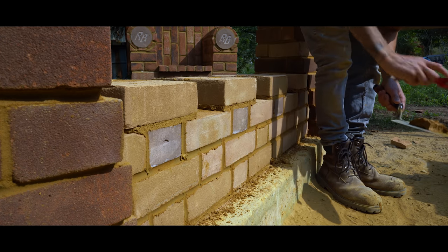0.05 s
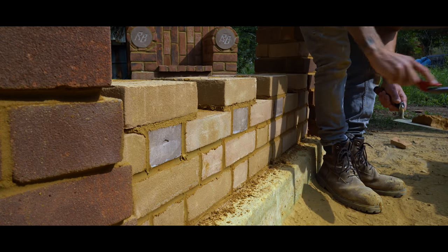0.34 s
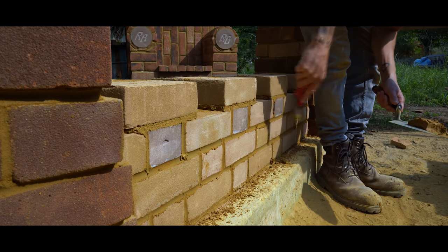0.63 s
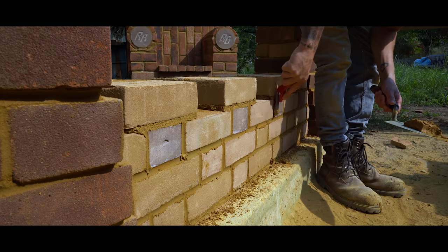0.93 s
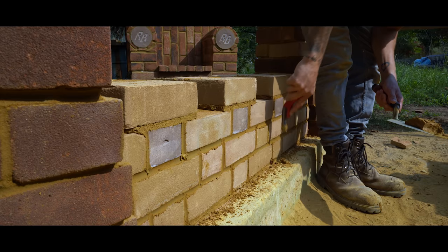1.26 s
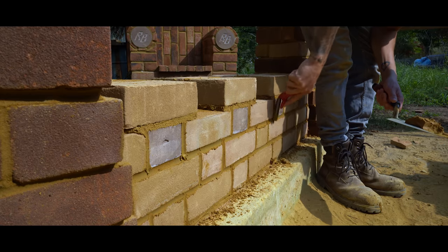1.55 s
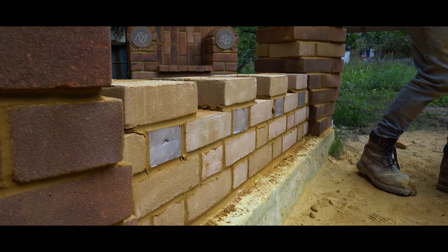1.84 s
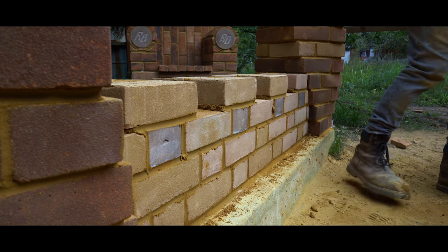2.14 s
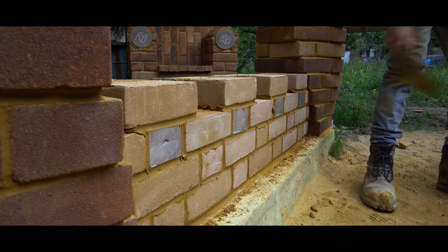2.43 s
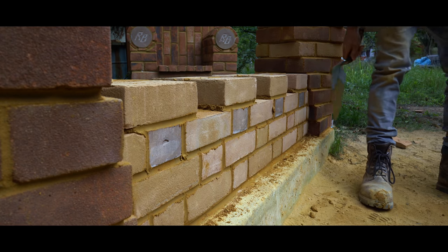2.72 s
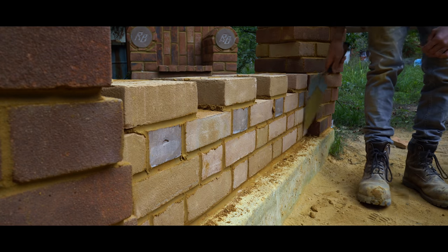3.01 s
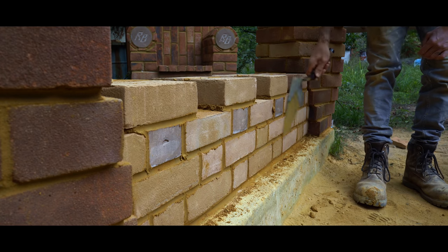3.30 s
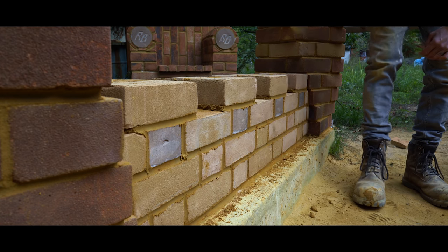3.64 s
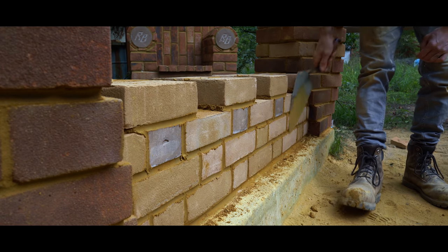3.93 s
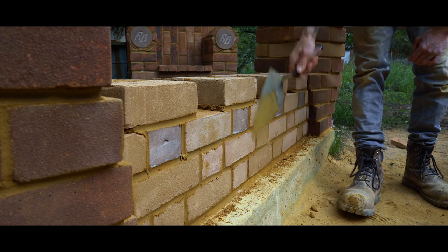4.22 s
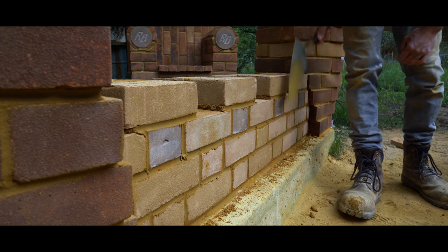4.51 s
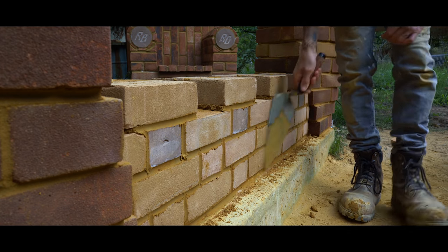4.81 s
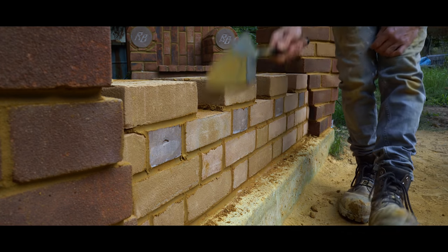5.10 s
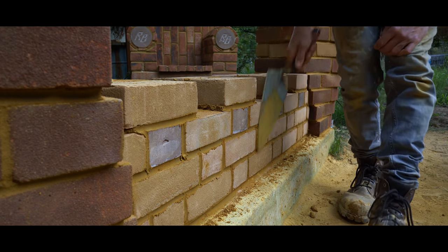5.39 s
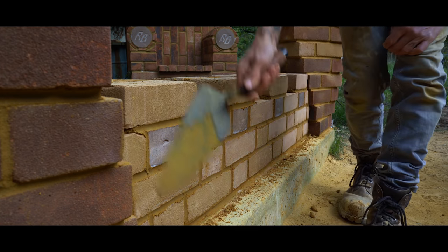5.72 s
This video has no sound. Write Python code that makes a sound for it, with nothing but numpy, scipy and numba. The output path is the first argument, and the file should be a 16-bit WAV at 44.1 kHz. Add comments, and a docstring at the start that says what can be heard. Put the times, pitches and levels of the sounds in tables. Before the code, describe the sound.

The scene is outdoors at a brick wall, with a faint wash of leaves and distant traffic. At about 0.2 seconds a tool raps a brick once, sharp and dry. Faint, short scratches in mortar follow at 1.1 and 1.7 seconds, with a small click at 1.6, while a far engine hums. At 1.8 seconds the background drops abruptly, and tool and brick clatter lightly with a thin steel ring. Boots tread softly on sand at about 2.5 and 3 seconds. Then a steel trowel scrapes along the brick face four times, close and loud, starting at about 3.1, 4.0, 4.7 and 5.4 seconds. Each stroke lasts nearly half a second and swells into a harsh rasp of rattling, hissing grit with tiny squeaks. The blade rings lightly each time it lifts, the last time at 5.9 seconds.

```python
"""At a garden wall outdoors, a bricklayer raps a brick and scratches mortar from a joint.
Tool and brick clatter, and boots tread on sand. Then a steel trowel is drawn four times along the
brick face: grit rattles and hisses under the pressed blade, which squeaks and rings on when it lifts.
Behind it all are leaves, far traffic and an engine; this background drops abruptly before the strokes."""
import sys
import numpy as np
from scipy import signal
from scipy.fft import rfft, irfft
from scipy.io import wavfile
from scipy.ndimage import uniform_filter1d
from numba import njit

SR = 44100
rng = np.random.default_rng(int(sys.argv[2]) if len(sys.argv) > 2 else 0)


def wav_out(sig):
    """Save sig, one row per channel (or a flat mono array), as 16-bit PCM at SR to the path in sys.argv[1]."""
    wavfile.write(sys.argv[1], SR, np.round(np.clip(np.atleast_2d(sig).T, -1, 1) * 32767).astype(np.int16))


N = 262395
TIME = np.arange(N) / SR
QUIETER_S = 1.789  # when the background drops

# Trowel strokes: the blade lands, hops, bites, is pushed along and springs off. Columns:
# lands_s, bites_s, leaves_s, landing_db, hardest_push_s, push_db, swell_db, sag_db,
# fine_grit_db, brick_body_db, free_ring_db, bend_hz, bend_boost_db
STROKES = [(3.123, 3.158, 3.558, -27.5, 3.38, -24.5, 6.5, 5, -5.5, -20, -42.5, 1680, 8),
           (3.963, 4.014, 4.366, -26, 4.27, -21, 7, 6, -5.5, -20, -39.5, 1056, 27),
           (4.709, 4.737, 5.156, -31, 5.09, -19.5, 9, 2, -5, -18, -38.5, 1171, 29),
           (5.442, 5.490, 5.906, -25, 5.70, -19.3, 6, 2.5, -4, -16, -37, 1680, 10)]


def undb(db):
    """Turn decibels into a factor to multiply by."""
    return 10 ** (np.asarray(db) / 20)


def unit(x):
    """Scale to an average strength (rms) of 1."""
    return x / np.sqrt(np.mean(x ** 2) + 1e-20)


def add(out, start_s, x):
    """Mix x into out from start_s on."""
    i = int(start_s * SR)
    out[i:i + len(x)] += x[:N - i]


def progress(start_s, end_s):
    """Share of the way from one moment to another, 0 to 1."""
    return np.clip((TIME - start_s) / (end_s - start_s), 0, 1)


def fade(fade_s):
    """Half a second of dying away. Here and below, fade_s is the time taken to fall by 60 dB."""
    return np.exp(-np.log(1000) * TIME[:SR // 2] / fade_s)


def walk(per_s):
    """Smooth random wandering, about 1 in size."""
    hold = max(int(SR / per_s), 1)
    jumps = np.repeat(rng.standard_normal(N // hold + 1), hold)
    return unit(uniform_filter1d(uniform_filter1d(jumps, hold), hold)[:N])


def colour(x, points):
    """Shape the tone along (pitch_hz, level_db) points; white noise keeps its overall strength."""
    size = 4096
    hz, db = np.transpose(points)
    grid_hz = np.maximum(np.fft.rfftfreq(size, 1 / SR), 1)
    gains = undb(np.interp(np.log(grid_hz), np.log(hz), db))
    cepstrum = irfft(np.log(gains))
    cepstrum[1:size // 2] *= 2  # folded forward, so the filter never sounds before its input
    cepstrum[size // 2 + 1:] = 0
    response = irfft(np.exp(rfft(cepstrum)))
    return signal.fftconvolve(x, response / np.linalg.norm(response))[:len(x)]


def low_cut(x, hz):
    """Turn down the bass below hz."""
    return signal.sosfilt(signal.butter(3, hz, "high", fs=SR, output="sos"), x)


@njit
def band_pass(x, hz, width_hz):
    """Let through a band around a pitch that may move."""
    out, band, low = np.empty(len(x)), 0., 0.
    for i in range(len(x)):
        tuning = np.tan(np.pi * min(hz[i], .45 * SR) / SR)
        damping = np.pi * width_hz / SR * (1 + tuning * tuning) / tuning
        swing = (band + tuning * (x[i] - low)) / (1 + tuning * (tuning + damping))
        band = 2 * swing - band
        low += 2 * tuning * swing
        out[i] = damping * swing
    return out


def resonate(x, tones, drift, swell_db):
    """Shake an object's own tones with x; the moving contact shifts each and feeds it more or less."""
    out = 0
    for k, (hz, width_hz, db) in enumerate(tones):
        feed = unit(undb(swell_db * np.tanh(walk(28))))
        pitch_hz = hz * (1 + drift * walk(12))
        out = out + (-1) ** k * undb(db) * band_pass(x * feed, pitch_hz, float(width_hz))
    power = sum(undb(db) ** 2 * np.pi * width_hz / SR for _, width_hz, db in tones)
    return out / np.sqrt(power)


def ring(tones, rise_s):
    """A struck object's tones die away freely; neighbours swing opposite ways."""
    t = TIME[:SR]
    out = sum((-1) ** k * undb(db - 60 * t / fade_s) * np.sin(2 * np.pi * hz * t)
              for k, (hz, db, fade_s) in enumerate(tones))
    return out * (1 - np.exp(-t / rise_s))


def grit(per_s, spread_db):
    """Sand grains break at random; a wider spread makes a few much louder than the rest."""
    size = undb(spread_db * np.clip(rng.standard_normal(N), -2, 2))
    breaks = rng.random(N) < per_s / SR
    return unit(breaks * size * rng.choice([-1, 1], N))


def slips(per_s, spread_db, length_s, top_hz):
    """Brief runs of sticking and slipping, each at its own pitch and strength."""
    out = np.zeros(N)
    for when, pitch, span, size, phase in rng.random((int(per_s * N / SR), 5)):
        t = TIME[:int(length_s * (.5 + span) * SR)]
        tone = np.sin(2 * np.pi * (top_hz * pitch * t + phase))
        add(out, when * N / SR, undb(spread_db * size ** 3) * np.hanning(len(t)) * tone)
    return unit(out)


def contact(start_s, end_s, db, release_s):
    """Loudness of one scrape: it bites quickly, follows db, then lets go."""
    bite = np.clip((TIME - start_s) / 0.00056, 0, 1)
    release = np.exp(-np.maximum(TIME - end_s, 0) / release_s)
    return undb(db) * bite * release


def yard(x, near_db=-15, near_fade_s=0.11, far_db=-26, far_fade_s=0.34):
    """Add quick echoes from wall and ground, then a faint tail from the buildings around."""
    out = x
    for db, fade_s, delay_s in ((near_db, near_fade_s, .002), (far_db, far_fade_s, .012)):
        scatter = colour(rng.standard_normal(SR // 2), [(200, -8.5), (4000, 5), (15000, -4.5)])
        echo = scatter * fade(fade_s) * (TIME[:SR // 2] > delay_s)
        out = out + undb(db) * signal.fftconvolve(x, echo / np.linalg.norm(echo))[:N]
    return out


def open_air():
    """Leaves and far traffic waver gently; at first they are louder and a far engine drones."""
    # Tone of the air before and after it drops: pitch_hz, level_db
    early_tone = [(25, -25), (60, -5), (230, -2.5), (500, -9), (1050, -6), (2600, -19.5), (3800, -15),
                  (5500, -27), (15500, -47.5)]
    late_tone = [(25, -26.5), (60, -12), (130, -3), (400, -6.5), (850, -8.5), (1400, -14), (2600, -18.5),
                 (3900, -17.5), (5700, -30), (15500, -46.5)]
    # The engine swelling and sinking: time_s, level_db
    engine_levels = [(0, -80.5), (.85, -69), (1.15, -58.5), (1.5, -57), (1.79, -67)]
    early = undb(-50.5 + 0.13 * walk(1.4)) * colour(rng.standard_normal(N), early_tone)
    late = undb(-63 + .5 * walk(2.9)) * colour(rng.standard_normal(N), late_tone)
    engine_db = np.interp(TIME, *np.transpose(engine_levels)) + 2 * walk(12)
    engine_hz = 60 * (1 + 0.035 * walk(9.8))
    engine = undb(engine_db) * np.sin(2 * np.pi * np.cumsum(engine_hz) / SR)
    return np.where(TIME < QUIETER_S, early + engine, late)


def boots():
    """The sole gives one soft push, then the sand crunches under it."""
    # Footfalls: time_s, thud_db, thud_hz, crunch_db, crunch_fade_s
    steps = [(2.4505, -23, 291.9, -44, 0.097), (2.482, -38, 241, -62, .05), (2.998, -39.5, 302, -47, 0.17),
             (3.024, -39.5, 293, -48, 0.076), (3.06, -46.5, 260, -70, .04)]
    # Tone of trodden sand: pitch_hz, level_db
    sand_tone = [(80, -22.5), (170, 1), (400, 9.5), (900, 4), (1400, 2), (2000, 0.5), (4000, -5.5),
                 (8000, -30), (15000, -37)]
    out = np.zeros(N)
    t = TIME[:SR // 2] - .01  # starts early to hold both halves of the thud
    for time_s, thud_db, thud_hz, crunch_db, fade_s in steps:
        thud = -np.sin(2 * np.pi * thud_hz * t) * np.exp(-(t * thud_hz / 0.63) ** 2)
        crunch = fade(fade_s) * grit(per_s=2700, spread_db=0)[:len(t)]
        add(out, time_s + t[0], undb(thud_db) * thud)
        add(out, time_s + .002, undb(crunch_db) * colour(crunch, sand_tone))
    return out


def mortar_scratches():
    """A small tool presses ever harder into soft mortar until it slips out; sand ticks off."""
    # Scratches: start_s, length_s, final_db, final_sand_db, rasp_hz (the tool's tone, set by the grip)
    scratches = [(1.019, .01, -49.5, -56, 1991), (1.057, .162, -55.5, -53.5, 1400),
                 (1.099, 0.0715, -40, -64, 2260), (1.677, 0.1, -41, -49, 3640)]
    # Tone of rubbed mortar: pitch_hz, level_db
    mortar_tone = [(200, -8.5), (1000, -2), (1650, -10), (2050, -4), (3200, -3.5), (4000, -1.5),
                   (5200, -22), (9000, -38)]
    sand_tone = [(4000, -3), (6800, -2), (11000, -7), (15500, 4.5)]
    out = np.zeros(N)
    for start_s, length_s, db, sand_db, rasp_hz in scratches:
        end_s = start_s + length_s
        swell_db = -15.5 * progress(end_s, start_s) ** 2
        press = contact(start_s, end_s, swell_db, release_s=.003)
        catch = unit(undb(3.5 * np.tanh(walk(300))))
        rub, sand = grit(per_s=5000, spread_db=3), grit(per_s=1000, spread_db=4.5)
        rasp = unit(band_pass(rub, np.full(N, float(rasp_hz)), width_hz=530.))
        out += undb(db) * press * catch * unit(colour(rub, mortar_tone) + undb(-3) * rasp)
        out += undb(sand_db) * colour(press * catch * sand, sand_tone)
    return out * (TIME < QUIETER_S)


def knocks():
    """Tool and brick clatter: a gritty click, the brick's dull clack and a thin ring of steel."""
    # Light knocks: start_s, clack_db, click_db, click_hz, click_width_hz, click_fade_s, steel_db
    hits = [(1.612, -43, -31, 4337, 5600, 0.028, -70), (1.839, -37.5, -36.5, 2540, 1470, 0.05505, -43.5),
            (1.855, -34.5, -53, 2500, 1200, .04, -59), (1.879, -38.5, -42, 2580, 995, 0.05, -62),
            (1.937, -28.5, -42.5, 2800, 3184, 0.062, -54), (1.967, -42, -56, 3000, 2000, 0.0422, -50),
            (1.99, -55.5, -52, 3443, 3000, 0.02584, -48), (2.89, -56, -47, 1283, 600, 0.02028, -82)]
    # Tone of a knocked brick: pitch_hz, level_db
    clack_tone = [(90, -19), (180, 4), (400, -10), (650, -5.5), (900, 7), (1300, -1.5), (2000, -23),
                  (6000, -55)]
    # Tones of struck steel: pitch_hz, level_db, fade_s
    steel_tones = [(3940, 1.5, 0.11), (4060, -2, 0.034), (5680, -14, 0.1192), (5950, -30.5, .1),
                   (8700, -36, 0.092)]
    out = np.zeros(N)
    for start_s, clack_db, click_db, click_hz, width_hz, fade_s, steel_db in hits:
        click_noise, clack_noise = rng.standard_normal((2, SR // 2))
        centre_hz = np.full(SR // 2, float(click_hz))
        click = band_pass(click_noise, centre_hz, 0.91 * width_hz)
        click = band_pass(click, centre_hz, 0.54 * width_hz)  # a second pass narrows it further
        add(out, start_s, undb(click_db) * unit(click) * fade(fade_s))
        add(out, start_s, undb(clack_db) * colour(clack_noise * fade(0.061), clack_tone))
        add(out, start_s, undb(steel_db) * ring(steel_tones, rise_s=0.00055))
    return out


def brick_rap(start_s=0.241, crush_s=0.0065):
    """A hard blow crushes the brick's skin for an instant; tool and brick ring briefly."""
    # Tone of the crack: pitch_hz, level_db
    crack_tone = [(120, -41), (330, -3), (800, -3.5), (1700, -2.5), (3000, -6), (5500, -9.5), (12000, -11),
                  (15500, -17.5)]
    # Tones that ring after the blow: pitch_hz, level_db, fade_s
    rap_tones = [(305.5, 0, 0.14), (816, 6.5, 0.0461), (1255, -2.5, 0.0633), (1660, 9.5, 0.029),
                 (1893, -0.5, .05), (2200, 5, 0.032), (2795.6, -11, .08), (3320, -15, 0.0849)]
    out, t = np.zeros(N), TIME[:SR // 2]
    crush = undb(-14) * np.exp(-(t / crush_s) ** 2)
    tail = undb(-28) * fade(0.083)
    crack = (crush + tail) * np.minimum(t / 0.0004, 1) * rng.standard_normal(len(t))
    add(out, start_s, colour(crack, crack_tone))
    add(out, start_s, undb(-20) * ring(rap_tones, rise_s=0.002))
    return low_cut(out, hz=200)  # small things give off no deep bass


def blade_squeaks():
    """Now and then the slipping edge locks roughly onto one tone of the blade."""
    # Squeaks: middle_s, pitch_hz, level_db, core_s (the whole squeak is 3.4 times as long)
    squeaks = [(3.131, 2416, -27, 0.004783), (3.297, 1990, -23.5, 0.004), (3.36, 3811, -28, .016),
               (3.374, 3273, -26, .014), (3.993, 3700, -30.5, 0.019), (4.147, 3294, -26.5, 0.011),
               (4.174, 1353, -29, 0.018), (4.255, 3703, -28, .014), (4.914, 3102, -21, 0.011),
               (5.056, 3700, -20.5, .015), (5.876, 3280, -21, 0.017)]
    out = np.zeros(N)
    for middle_s, hz, db, core_s in squeaks:
        t = TIME[:int(3.4 * core_s * SR)]
        roughness = np.cumsum(.045 * rng.standard_normal(len(t)))
        tone = np.sqrt(2) * np.sin(2 * np.pi * hz * t + roughness)
        add(out, middle_s - t[-1] / 2, undb(db) * np.hanning(len(t)) * tone)
    return out


def blade_ring(hop_db=-16):
    """The free blade rings lightly as it hops, and again on lifting; the bend brings out a low tone."""
    # Tones of the free blade: pitch_hz, level_db, fade_s
    free_tones = [(725, 1.5, 0.21), (1106, -11.5, 0.41), (1255.5, 3, 0.46), (1671, -6.5, 0.38),
                  (2180, 3, 0.13), (2690, 3.5, 0.21), (3130, 2.5, 0.33), (3430, -2, 0.29),
                  (3300, 13.5, 0.16), (3840, -8.5, 0.57), (4230, -1.5, 0.18), (4940, -7, .18),
                  (5529, -23, .13)]
    out = np.zeros(N)
    hz, db, fade_s = np.transpose(free_tones)
    for lands_s, _, leaves_s, landing_db, *_, ring_db, bend_hz, boost_db in STROKES:
        apart = ((hz - bend_hz) / 95) ** 2
        bend_db = boost_db * (1 - apart) * np.exp(-apart / 2)  # tones near bend_hz gain, the next lose
        add(out, lands_s, undb(landing_db + hop_db) * ring(free_tones, rise_s=.004))
        add(out, leaves_s, undb(ring_db) * ring(zip(hz, db + bend_db, fade_s), rise_s=0.0017))
    return out


def blade_shimmer(x, share_db=-4, fade_s=0.091):
    """Add the blade's many small tones; each stroke holds it at a new angle and finds another set."""
    out = x.copy()
    for lands_s, _, leaves_s, *_ in STROKES:
        during = (TIME > lands_s - .1) & (TIME < leaves_s + .1)
        tones = rng.standard_normal(SR // 2) * fade(fade_s)
        out += undb(share_db) * signal.oaconvolve(x * during, tones / np.linalg.norm(tones))[:N]
    return out / np.hypot(1, undb(share_db))


def trowel_pressure(bumps_per_s=45, skim_s=0.036):
    """How hard the strokes work the coarse grains, the fine grit and the brick's body."""
    # The edge catches on a ridge, then skims over it. Columns:
    # start_s, level_db, length_s, fine_grit_db, brick_body_db, skim_dip_db
    catches = [(3.219, -25, 0.034, -13, -13, 6), (3.2935, -15.5, 0.0047, -12, -17, 1),
               (3.315, -23.5, 0.01303, -10, -10, -2), (3.504, -28.5, 0.028, 4.5, -18, 4.5),
               (4.049, -20.5, .024, -10, -25, 1), (4.736, -25.5, 0.016, -0.5, -8.5, 2.5),
               (4.854, -27, 0.025, -14, -8.5, -2), (5.047, -22.5, 0.021, 1, -35.5, 2),
               (5.115, -17.5, 0.025, -4, -26.5, 3), (5.493, -19, 0.01, -16.5, -31, 1),
               (5.692, -31, 0.016, 14, -4, 0.5)]
    coarse, fine, body = np.zeros((3, N))
    landings = []
    for (lands_s, bites_s, leaves_s, landing_db, hardest_s,
         push_db, swell_db, sag_db, fine_db, body_db, *_) in STROKES:
        db = push_db - swell_db * progress(hardest_s, bites_s) ** 1.38
        db -= sag_db * progress(hardest_s, leaves_s) ** 2
        along = progress(bites_s, leaves_s) - .5
        finer_db = 1.5 * along  # the grit is ground finer as the stroke goes on
        arch_db = -8.5 * (2 * along) ** 2  # the brick sounds most at mid-stroke
        coarse += contact(bites_s, leaves_s, db, release_s=0.0032)
        fine += contact(bites_s, leaves_s, db + fine_db + finer_db, release_s=0.0028)
        body += contact(bites_s, leaves_s, push_db + body_db + arch_db, release_s=0.0027)
        landings.append((lands_s, landing_db, 0.018, -4, -14))  # a scuff: a catch with no skim
    skim = undb(-sum(dip_db * np.exp(-((TIME - start_s - 2.4 * length_s) / skim_s) ** 2)
                     for start_s, _, length_s, _, _, dip_db in catches))
    coarse *= skim
    fine *= skim * unit(undb(walk(bumps_per_s)))  # the brick's face is bumpy
    body *= unit(undb(2 * walk(bumps_per_s)))
    for start_s, db, length_s, fine_db, body_db, *_ in landings + catches:
        t = TIME - start_s
        bite = undb(db) * np.clip(t / 0.0024, 0, 1) * np.exp(-(t / length_s) ** 2)
        coarse = np.hypot(coarse, bite)
        fine = np.hypot(fine, bite * undb(fine_db))
        body = np.hypot(body, bite * undb(body_db))
    return coarse, fine, body


def trowel_scrape():
    """The edge judders over grains; they ring the pressed blade, hiss, and shake the brick."""
    # Tones of the pressed blade (main, high, and changing with the grip): pitch_hz, width_hz, level_db
    pressed_tones = [(880.4, 14.3, -0.5), (1182, 63, -7.5), (1703, 35, 1.5), (2218, 104, -1.5),
                     (2642, 22, -1), (3261, 87, -1), (3832.1, 17, -6), (4494, 37, -2), (4840, 85, -14),
                     (5056.2, 32, -3.5), (5350, 35, -5.5), (5740, 48, -7.5), (5970, 41, -14)]
    high_tones = [(6095, 100, -3.5), (6580, 89, -5), (7180, 150, -6), (8400, 160, -13.5), (9090, 170, -5),
                  (9363.6, 44, -4.5), (9950, 330, -7.5), (10550, 96, -6), (11220, 210, -6.5),
                  (12340, 130, -2.5), (13500, 210, -6), (14500, 350, -7.5)]
    grip_tones = [(1282, 18, 0), (1314, 9.7, -4), (1580, 21, -6.5), (2737.7, 56, -6), (3084, 20, 2.5),
                  (3676, 17, 3), (4076, 57, -2), (5282, 18, -5.5), (14460, 40, -10)]
    # Tone of fine grit, crushed grit and the brick's body: pitch_hz, level_db
    hiss_tone = [(4500, -15), (6200, -6.5), (8000, 4.5), (10000, -10), (13000, -12.5), (15600, -6.5)]
    rasp_tone = [(400, -24.5), (700, -4), (1000, -7.5), (1350, 3.5), (1600, -3.5), (2150, -2), (2900, -1.5),
                 (3300, 0), (3900, 2), (4700, -12.5), (5800, -29.5), (7000, -34.5)]
    brick_tone = [(70, -42), (130, -18), (180, -3), (300, 3.5), (480, 3.5), (700, -1), (1100, -19.5)]
    coarse, fine, body = trowel_pressure()
    judder = unit(undb(0.5 * walk(260) + 0.24 * walk(80)))  # the rough face jolts all grains together
    rattle = coarse * judder * grit(per_s=7000, spread_db=5.5)
    fine = fine * judder * unit(undb(2.2 * walk(170)))
    pressed = undb(-5) * resonate(rattle, pressed_tones, drift=.0015, swell_db=5)
    gripped = undb(-6.5) * resonate(rattle, grip_tones, drift=.001, swell_db=7)
    # sand cracks under the edge in short, bright flecks
    flecks = slips(per_s=1500, spread_db=12, length_s=.003, top_hz=16000)
    fine_rattle = fine * grit(per_s=5000, spread_db=0.5)
    sizzle = undb(-2) * resonate(fine_rattle, high_tones, drift=0.009, swell_db=3)
    crackle = grit(per_s=2500, spread_db=4)
    hiss = undb(-7) * colour(fine * (flecks + crackle), hiss_tone)
    # longer slips give the rasp its coarse, shifting tone
    slipping = slips(per_s=800, spread_db=12, length_s=.014, top_hz=4800)
    crushing = grit(per_s=3700, spread_db=12.5)
    rasp = undb(-11) * colour(coarse * judder * (slipping + crushing), rasp_tone)
    brick = undb(-3) * colour(body * judder * grit(per_s=900, spread_db=2), brick_tone)
    return low_cut(pressed + gripped + sizzle + blade_shimmer(rasp + hiss) + brick, hz=121.53)


def scene():
    """All the work at the wall, over the open air, in one channel."""
    rap = yard(brick_rap(), near_db=-18, near_fade_s=.06, far_db=-31, far_fade_s=.28)
    trowel = trowel_scrape() + blade_squeaks() + blade_ring()
    return (yard(trowel + knocks()) + rap + mortar_scratches() + boots() + open_air())[None]


def record(dry):
    """Take away the deepest bass and the highest treble."""
    treble_cut = signal.ellip(10, .2, 80, 15800, fs=SR, output="sos")
    return signal.sosfilt(treble_cut, low_cut(dry, hz=35))


dry = scene()
out = record(dry)
wav_out(out)
```